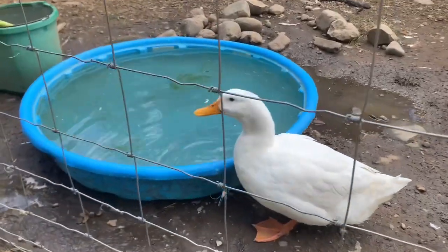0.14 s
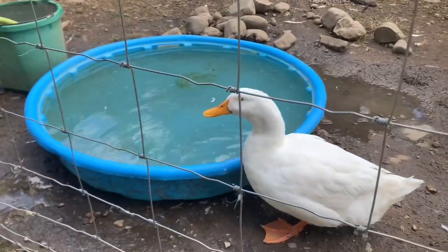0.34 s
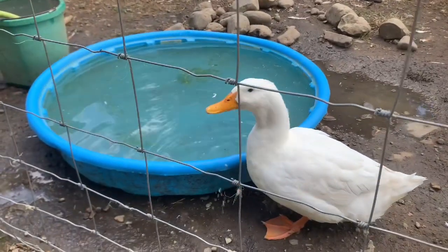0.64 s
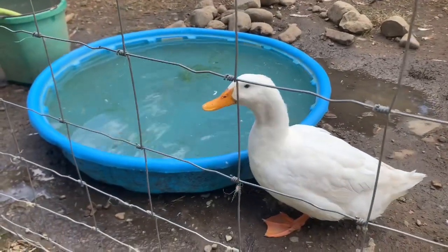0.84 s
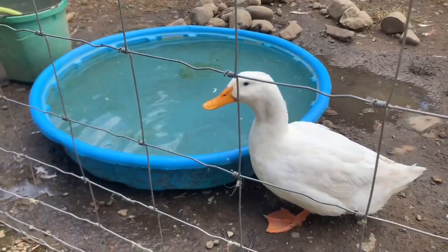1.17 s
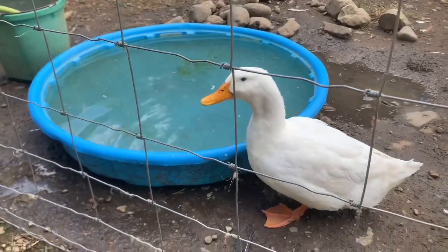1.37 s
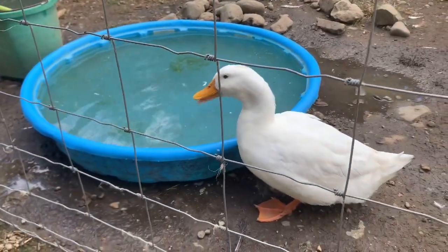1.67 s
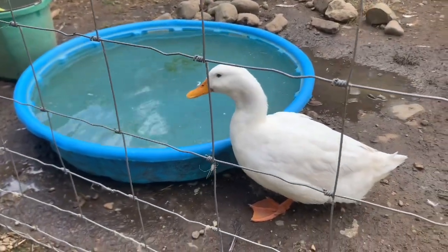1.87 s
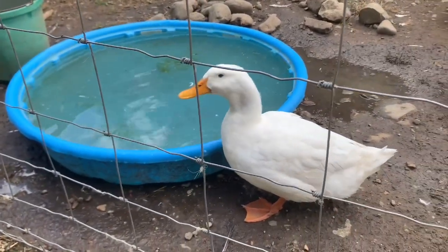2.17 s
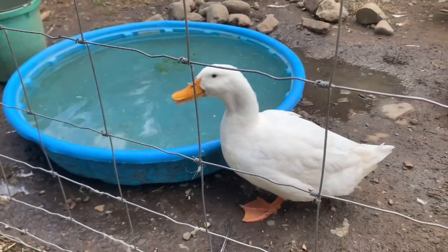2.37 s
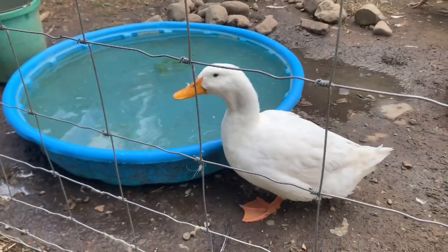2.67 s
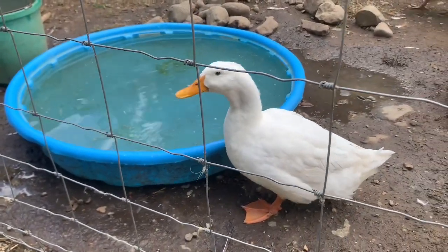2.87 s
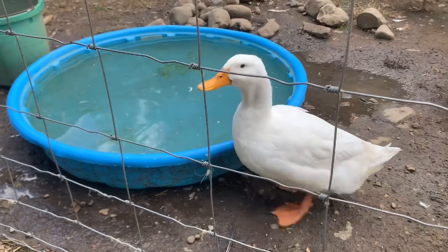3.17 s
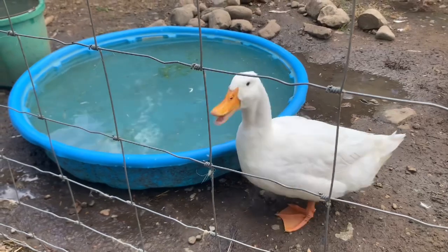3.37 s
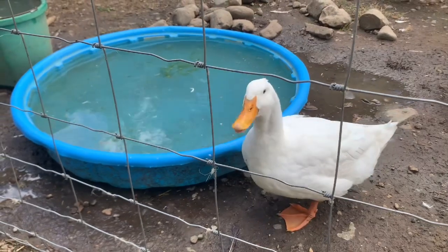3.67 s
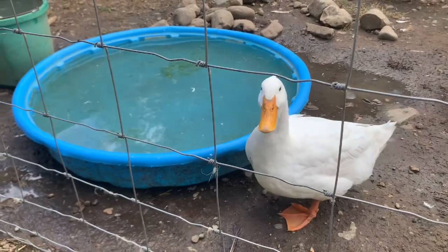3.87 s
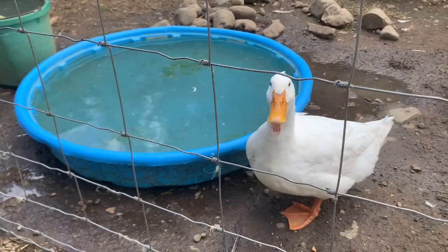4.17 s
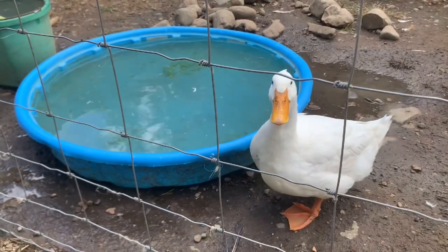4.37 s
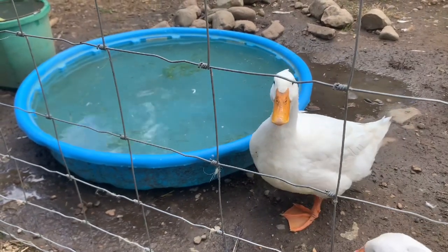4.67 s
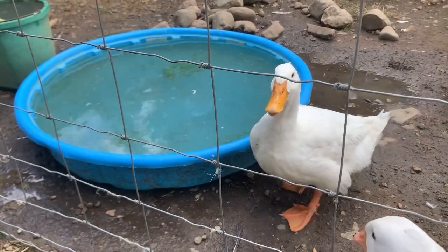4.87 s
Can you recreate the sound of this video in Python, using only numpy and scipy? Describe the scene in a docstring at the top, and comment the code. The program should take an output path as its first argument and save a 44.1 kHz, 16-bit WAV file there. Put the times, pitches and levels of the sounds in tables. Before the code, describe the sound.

Outdoors in a fenced, muddy pen, one duck near the microphone quacks steadily, short raspy bursts mostly in pairs, with small wet bill ticks between. Soft clucks from other fowl come early, then faint thin whines later. The quacks grow slightly louder and change nasal colour as the duck turns to face the microphone. Quiet air and a lumpy low rumble lie beneath.

```python
"""A duck quacks fifteen times, mostly in pairs, and turns to face the microphone, over quiet air and a low rumble.
Each quack is a rattle of five to seven beats of the syrinx: a smooth push and a ragged puff of noise,
shaped by throat and bill and echoed at once by the wet ground. Ringing resonances make small ticks of the bill.
Other fowl cluck and whine softly in the pen as gliding tones; shaped noise makes the air, rumble and a brief hiss."""
import sys
import numpy as np
from scipy import signal
from scipy.fft import rfft, irfft
from scipy.io import wavfile

SR = 44100
rng = np.random.default_rng(int(sys.argv[2]) if len(sys.argv) > 2 else 0)


def output_pcm(signal):
    """Save a mono or channel-first signal as 16-bit PCM at the path in sys.argv[1].

    Samples are clipped to [-1, 1] before scaling.
    """
    pcm = np.clip(np.atleast_2d(signal).T, -1, 1) * 32767
    wavfile.write(sys.argv[1], SR, np.round(pcm).astype(np.int16))


N = 221249
TIME = np.arange(N) / SR
TAPS, LEAD = 2048, .012  # short sounds: length in samples, and seconds they begin ahead of their moment
HZ = np.fft.rfftfreq(TAPS, 1 / SR)
AGE = np.arange(TAPS) / SR - LEAD  # seconds since the moment of a short sound


def gain_of(db):
    """Decibels to a factor."""
    return 10 ** (np.asarray(db) / 20)


def evened(x):
    """Scales to rms 1."""
    return x / np.sqrt(np.mean(x ** 2) + 1e-20)


def read(points, hz):
    """Each value column of a table, read on a log-frequency axis."""
    f, *columns = np.transpose(points)
    return np.array([np.interp(np.log(hz + 1), np.log(f + 1), c) for c in columns])


def add(mix, s, sound):
    """Lays a sound into the mix at time s."""
    part = mix[..., max(round(s * SR), 0):][..., :sound.shape[-1]]
    part += sound[..., :part.shape[-1]]


def delay(s):
    """The spectrum of a delay."""
    return np.exp(-2j * np.pi * HZ * s)


def wavering(count, size):
    """Smooth random wandering of rms 1; size is half the smoothing window in samples."""
    return evened(signal.fftconvolve(rng.standard_normal(count), signal.windows.hann(2 * size), "same"))


def noise(colour, likeness):
    """Stereo noise of rms 1 with a given spectrum and left-right likeness."""
    hz = np.fft.rfftfreq(N, 1 / SR)
    left, other = rfft(rng.standard_normal((2, N)))
    same = np.clip(read(likeness, hz)[0], -1, 1)
    right = same * left + np.sqrt(1 - same ** 2) * other
    return evened(irfft(np.array([left, right]) * gain_of(read(colour, hz)), N))


def outdoors(air_db=-58, drift_db=0.02):
    """Quiet air drifts slightly in level, with the low rumble and a brief soft hiss as shaped noise."""
    # Each row: frequency in Hz, relative level in dB per Hz.
    air_colour = [(80, -24), (160, -5.5), (270, -8), (400, -1), (520, 0), (740, -8), (1000, -1),
                  (1350, -2.5), (2000, -9.5), (3200, -23), (5000, -30.5), (8000, -37.5), (12000, -37.5),
                  (15500, -57.5)]
    hiss_colour = [(1500, -16), (2500, -6.5), (4500, 4), (7500, -4), (9000, -16.5), (12000, -27)]
    # Level of the hiss. Each row: time in seconds, level in dB.
    hiss_level = [(0, -72.5), (.09, -72.5), (.2, -87), (.35, -110)]
    # How alike the two channels are. Each row: frequency in Hz, left-right likeness from -1 to 1.
    likeness = [(60, 0.8), (120, 1), (260, 0.61), (540, 0.28), (1120, -0.54), (2320, -0.028), (4820, 0.041)]
    drift = np.interp(TIME, np.linspace(0, TIME[-1], num=40), rng.standard_normal(size=40))
    air = gain_of(air_db + drift_db * drift) * noise(air_colour, likeness)
    air = air * gain_of([[1], [-.5]])  # left, right
    hiss = gain_of(np.interp(TIME, *np.transpose(hiss_level))) * noise(hiss_colour, likeness)
    return air + rumble() + hiss


def rumble(lumpy_db=2.0):
    """Low noise with a lumpy level dies down; now and then it swells into a dull bump."""
    # Each row: frequency in Hz, relative level in dB per Hz.
    colour = [(15, -25.5), (30, -13), (48, 4), (80, 0.5), (115, -8), (170, -21.5), (400, -46), (1500, -100)]
    # Steady part, before the lumps. Each row: time in seconds, level in dB.
    steady_level = [(0, -66.5), (.3, -59.5), (.9, -55.5), (1.6, -61), (1.9, -53), (2.6, -64), (5, -69.5)]
    # Dull swells that stand out. Each row: time of the peak in seconds, length in seconds, peak level in dB.
    bumps = [(.28, 0.077, -52), (1.96, 0.044, -45), (2.675, 0.086, -46.5), (3.23, 0.3, -58),
             (3.67, 0.071, -58.5), (3.99, 0.04, -52), (4.22, 0.22, -67), (4.49, 0.13, -55.5),
             (4.81, 0.13, -57.5)]
    lumps = np.interp(TIME, np.linspace(0, TIME[-1], num=60), rng.standard_normal(size=60))
    level = gain_of(np.interp(TIME, *np.transpose(steady_level)) + lumpy_db * lumps)
    for s, length, db in bumps:
        add(level, s - length / 2, gain_of(db) * signal.windows.hann(round(length * SR)))
    return level * noise(colour, [(50, 0.77), (200, 1.0)])  # (Hz, left-right likeness)


def fowl():
    """Other birds: clucks and, from further off, whines."""
    return clucks() + whines()


def clucks(trim_db=1, hoarse=0.074, partials=3):
    """Short gliding tones with a few overtones, made hoarse by a wandering pitch and level."""
    # Each row: start in seconds, length in seconds, start pitch in Hz, end pitch in Hz,
    # level in dB before the trim and the channel balance, fall per overtone in dB.
    cluck_rows = [(.16, 0.011, 525, 366, -52.5, -28), (.9, 0.028, 522, 490, -49.5, -40),
                  (0.963, 0.023, 754, 470, -47.5, -12), (1.091, 0.025, 548, 650, -45.5, -7.5),
                  (1.173, 0.014, 666, 487, -51.5, -35), (1.331, 0.0246, 490, 586, -42, -12.5),
                  (1.398, 0.023, 670, 490, -46.5, -9), (3.432, 0.13, 513.3, 554, -57, -20),
                  (3.481, 0.028, 246, 252, -52.5, -4), (3.481, 0.037, 498, 494, -51, -19),
                  (3.62, 0.036, 241, 235, -52.5, -3), (3.866, 0.038, 235, 216, -57.5, -4.5),
                  (4.022, 0.041, 200, 181.5, -53.5, -1), (4.672, 0.039, 484, 510, -57.5, -3.5)]
    out = np.zeros((2, N))
    for s, length, start_hz, end_hz, db, fall_db in cluck_rows:
        hz = np.linspace(start_hz, end_hz, round(length * SR))
        turns = np.cumsum(hz * (1 + hoarse * wavering(len(hz), size=150))) / SR
        tone = sum(gain_of(fall_db * k) * np.sin(2 * np.pi * ((k + 1) * turns + rng.random()))
                   for k in range(partials))
        swell = np.sin(np.linspace(0, np.pi, len(hz))) * (1 + 0.3 * wavering(len(hz), size=150))
        add(out, s, gain_of(db + trim_db) * evened(tone * swell))
    return out * gain_of([[2.5], [-3]])  # left, right


def whines(waver=0.026, flutter=0.23):
    """Thin sine notes, unsteady in pitch and level, each bend through one arch."""
    # Each row: start in seconds, length in seconds, start, middle and end pitch in Hz,
    # peak level in dB before the flutter.
    notes = [(1.087, 0.092, 1256, 1300, 990, -55), (3.418, 0.35, 1030, 1141, 1083, -59.5),
             (3.704, 0.182, 970, 845, 970, -57), (3.946, 0.3, 1094, 1020, 1086, -54.5),
             (4.186, 0.15, 1222, 1235, 1194, -56), (4.305, 0.041, 933, 950, 1020, -57.5),
             (4.327, 0.068, 1204, 1220, 1330, -54), (4.856, 0.12, 980, 948, 950, -61)]
    out = np.zeros((2, N))
    for s, length, start_hz, middle_hz, end_hz, db in notes:
        u = np.linspace(0, 1, round(length * SR))
        hz = np.polyval(np.polyfit([0, .5, 1], [start_hz, middle_hz, end_hz], 2), u)
        tone = np.sin(2 * np.pi * np.cumsum(hz * (1 + waver * wavering(len(u), size=400))) / SR)
        swell = (1 + flutter * wavering(len(u), size=400)) * signal.windows.tukey(len(u), .5)
        add(out, s, gain_of(db) * tone * swell)
    return out


def ticks(scrape=0.17, scrape_s=0.0036):
    """The bill parts with a small wet tick: a click and a short scrape strike its resonances."""
    # Each row: time in seconds, peak level in dB, brightness in dB per octave.
    tick_rows = [(.349, -36, -4.5), (.879, -33, -1), (1.245, -57, 13), (1.336, -38, -0.5),
                 (2.015, -34.5, -1.5), (2.653, -32.5, 0.5), (2.899, -31.5, 1.5), (3.161, -41, 7),
                 (3.297, -30, 0), (3.878, -27.5, 2.8), (4.116, -31, 3.5), (4.49, -27.5, 6),
                 (4.665, -53, 15)]
    # What a tick rings with. Each row: frequency in Hz before a small random shift,
    # level in dB before the brightness tilt, time to fall by 60 dB in seconds.
    resonances = [(500, -4, 0.057), (862, 0, 0.036), (1220, 0, 0.05), (1945, -11.5, 0.066),
                  (2310, -9, 0.012), (3090, -5.5, 0.0043), (3930, -13.5, 0.011), (6700, -24.5, 0.018)]
    out, t = np.zeros((2, N)), AGE + LEAD
    for s, db, slope_db in tick_rows:
        ring = np.zeros(TAPS)
        for hz, level, t60 in resonances:
            decay = gain_of(level - 60 * t / t60 + slope_db * np.log2(hz / 1500))
            ring += decay * np.sin(2 * np.pi * hz * rng.uniform(0.932, 1.05) * t)
        drive = (t == 0) + scrape * rng.standard_normal(TAPS) * np.exp(-t / scrape_s)
        softening = 1 + (HZ / 8500) ** 8
        tick = at_ports(rfft(drive) * rfft(ring) * delay(LEAD) / softening, facing=0.62)
        add(out, s - LEAD, gain_of(db) * tick / abs(tick).max())
    return out


def at_ports(spectrum, facing):
    """A short sound from the duck's place, split in level and phase between the two microphone ports."""
    # Each row: frequency in Hz, left minus right in dB side-on, the same head-on, left's phase lead in radians.
    ports = [(200, 7, 1.5, 1.1), (700, -1, 1, -2), (950, 8.5, 12.5, -1.42), (1422, 0, -5, -1.7),
             (1555, -8.5, -5, -0.5), (1550, -4, -6.5, -1.1), (1926, 1, 8.5, 0.01), (2565, 15.5, 4, -2),
             (2310, 10, 7.5, -1.3), (3170, 6, 6.5, -2), (3290, 9.5, 9, -1.56), (3830, -4, 4.5, -2),
             (4330, -2.5, -5.5, -2), (5670, -3.5, 1, -2.5)]
    side_db, front_db, lead = read(ports, HZ)
    half = gain_of((side_db + facing * (front_db - side_db)) / 2) * np.exp(.5j * lead)
    return irfft(spectrum * np.array([half, 1 / half])) * signal.windows.tukey(TAPS, 1 / 3)


def duck(drag_s=0.00056, jitter_s=.0003, shimmer_db=0.29, lead_in_db=-19, limp_db=-11):
    """Each quack swells and fades while the bill opens and shuts; the beats come fastest in the middle."""
    # Each row: start in seconds, number of beats, mean beats per second, mid-quack level in dB,
    # swell from the first beat in dB, factor on the throat's resonances, bill resonance in dB, twang in Hz.
    quacks = [(0.3698, 6, 83.8, -31.5, 16, 1.05, 8, 2920), (.621, 7, 85.3, -29.5, 10, 1.012, 12, 3350),
              (0.9026, 6, 85.8, -31, 4.5, 1, 4.5, 3190), (1.354, 5, 83.8, -31.5, 2, 1.017, 11, 4350),
              (1.6163, 7, 91, -31, 10, 1.076, -1, 3490), (2.0352, 6, 84, -30, 1.5, 1.058, 0, 3930),
              (2.293, 7, 88.8, -28.5, 6, 1.027, 9, 3370), (2.66, 6, 74.2, -30.5, 14.5, 1.056, 10, 3290),
              (2.9219, 7, 96.4, -28.5, 6, 0.98, 16.5, 4540), (3.3155, 6, 86.4, -30.5, 2.5, 1.003, 4, 4320),
              (3.5595, 7, 93, -25.5, 8.5, 1.053, -3, 3700), (3.898, 6, 81.6, -27, 7.5, 1.02, 3.5, 3250),
              (4.1488, 6, 85.5, -27, 0, 1.044, 3, 4200), (4.51, 6, 86.6, -30, 5, 1, 1, 2250),
              (4.7453, 7, 89.3, -28, 4.5, .97, 2, 4600)]
    # The duck turns its head and steps closer. Each row: time in seconds, facing from 0 side-on to 1 head-on,
    # delay of the ground echo in ms.
    pose = [(.37, 0.075, 1.41), (.62, 0.071, 1.53), (1.2, 0, 1.51), (2.04, 0, 1.38), (2.85, 0.074, 1.5),
            (3.301, 0.66, 1.6), (3.6, 0.47, 1.69), (4.151, 0.92, 1.762), (4.75, 0.95, 1.91)]
    fade_db = -5  # the last beat against mid-quack
    # a harder push rattles faster and brighter, and a louder quack is brighter too
    usual_rate, bright_db_per_rate = 90.1, 0.68  # beats per s, treble dB for each beat per s more
    usual_db, bright_per_db = -29, .5  # mid-quack dB, treble dB for each dB more
    twang_db = 11  # height of the high resonance with the bill wide open
    open_late, shut_by_end = 1.27, 0.95  # widest past the middle; share of the swing done at the last beat
    rough_shut, rough_open = 0.54, 0.68  # noise share of a beat: raspier with the bill wide open
    out = np.zeros((2, N))
    pose_s, facings, echoes_ms = np.transpose(pose)
    for s, beats, rate, peak_db, swell_db, size, bill_db, twang_hz in quacks:
        facing = np.clip(np.interp(s, pose_s, facings), 0, 1)
        echo_ms = np.interp(s, pose_s, echoes_ms)
        bright_db = bright_db_per_rate * (rate - usual_rate) + bright_per_db * (peak_db - usual_db)
        colour = facing, size, bill_db, bright_db, echo_ms, twang_hz, twang_db
        first_db, last_db = peak_db - swell_db, peak_db + fade_db
        k = np.arange(round(beats))
        u = k / k[-1]  # progress through the quack, 0 to 1
        slip, shimmer = rng.standard_normal((2, len(k)))
        starts = s + k / rate + drag_s * np.sin(2 * np.pi * u) + jitter_s * slip
        arch = np.polyfit([0, .5, 1], [first_db, peak_db, last_db], 2)
        levels_db = np.polyval(arch, u) + shimmer_db * shimmer
        openings = np.sin(np.pi * shut_by_end * u ** open_late)
        for start, db, opening in zip(starts, levels_db, openings):
            rough = rough_shut + (rough_open - rough_shut) * opening
            add(out, start - LEAD, gain_of(db) * beat(opening, 1 / rate, *colour, rough=rough))
        # air rustles through the membranes before they catch
        rustle = beat(0.067, 2.3 / rate, *colour, rough=0.78, leak=4)
        add(out, s - .01 - LEAD, gain_of(peak_db + lead_in_db) * rustle)
        # and they give one last limp flap as the pressure drops
        flap = beat(0, 1 / rate, *colour, rough=0.58)
        add(out, starts[-1] + 0.0054 - LEAD, gain_of(last_db + limp_db) * flap)
    return out


def beat(opening, period, facing, size, bill_db, bright_db, echo_ms, twang_hz, twang_db, rough,
         leak=.42, leak_open=.45, peak_s=0.001594, puff_at_s=0.0023, puff_s=0.0013, scatter_s=0.00083,
         smooth_hz=2600, rasp_db=2, glide=0.024, unsteady=0.016, twang_width_hz=170):
    """One beat of the syrinx: a smooth push swells in the throat, and a ragged puff rasps through the gap."""
    # the resonances rise as the bill opens
    rise = 1 + glide * (opening - .6) + unsteady * rng.standard_normal()
    # the open bill adds a high resonance
    twang = twang_db * opening / (1 + ((HZ - twang_hz * rise) / twang_width_hz) ** 2)
    db = throat(opening, facing, size * rise, bill_db, bright_db) + twang
    push = gain_of(db) / np.sqrt(1 + (HZ / smooth_hz) ** 4) * delay(LEAD + peak_s)
    since = AGE - puff_at_s - scatter_s * rng.standard_normal()
    # blown hard, the gap never quite shuts: air leaks between beats, more with the bill open
    leaking = (leak + leak_open * opening) * np.exp(-(since / (period / 2)) ** 2)
    gap = np.exp(-(since / puff_s) ** 2) + leaking
    rasp = rasp_db * HZ ** 4 / (HZ ** 4 + smooth_hz ** 4)
    puff = rfft(gap * rng.standard_normal(TAPS)) * causal(db + rasp)
    voice = (1 - rough) * push / np.linalg.norm(push) + rough * puff / np.linalg.norm(puff)
    heard = at_ports(voice * ground(facing, echo_ms), facing)
    return evened(heard) * np.sqrt(period * SR / TAPS)  # equal energy per unit of period


def throat(opening, facing, size, bill_db, bright_db, shut_db=-10, bill_shut=0.69, bill_hz=2000,
           bill_width_hz=200):
    """Gain of throat and bill in dB; an open bill lets the treble out."""
    # Voice colour. Each row: frequency in Hz before the size factor, relative dB side-on, relative dB head-on.
    voice_colour = [(300, -40.5, -29.5), (670, -32, -36), (950, -14, -30.5), (1217, -11.5, 0),
                    (1538, 4, -4), (1850, -21, 3.5), (1993, -15.5, -18), (2518, -19.5, -10.5),
                    (2738, -26.5, -33), (2840, -17.5, -13.5), (3100, -19, -19.5), (4427, -22.5, -19.5),
                    (5300, -39, -28), (5080, -41.5, -32.5), (6290, -68, -28), (8300, -83.5, -83)]
    side_db, front_db = read(voice_colour, HZ / size)
    treble = np.clip(np.log2((HZ + 1) / 1700), 0, 1)
    bill_height = bill_db * (bill_shut + (1 - bill_shut) * opening)
    bill = bill_height / (1 + ((HZ - bill_hz) / bill_width_hz) ** 2)
    return side_db + facing * (front_db - side_db) + bill + treble * (bright_db + shut_db * (.75 - opening))


def causal(db):
    """The response of a passive resonator with this gain curve: it rings only after it is struck."""
    log_gain = np.log(gain_of(np.r_[db, db[-2:0:-1]]))
    return np.exp(np.conj(signal.hilbert(log_gain)))[:len(db)]


def ground(facing, echo_ms, echo=0.57, echo_facing=0.098, second=0.35):
    """The wet ground repeats the voice, and again more weakly when the duck faces this way: nasal bands."""
    bounce = delay(echo_ms / 10 ** 3)
    return 1 + (echo + echo_facing * facing) * bounce + second * facing * bounce ** 2


def yard(x, gap_s=0.0083):
    """A faint scatter of echoes from the pen and the trees: noise that dies at its own rate in each band."""
    # Each row: frequency in Hz, time to fall by 60 dB in seconds.
    decay_times = [(300, 0.25), (1500, 0.24), (4000, 0.29), (9000, 0.063)]
    taps = rng.standard_normal((2, SR // 2)) * (np.arange(SR // 2) > gap_s * SR)
    hz, t, z = signal.stft(taps, SR, nperseg=256)
    decay = gain_of(-60 * t / read(decay_times, hz).T)
    tail = signal.istft(z * decay, SR, nperseg=256)[1]
    return signal.fftconvolve(x, tail / np.linalg.norm(tail[0]), axes=1)[:, :N]


def scene(duck_wet_db=-30, fowl_wet_db=-12):
    """The near duck is almost dry; the other birds have more of the yard on them."""
    near, far = duck() + ticks(), fowl()
    echoes = yard(gain_of(duck_wet_db) * near + gain_of(fowl_wet_db) * far)
    return near + far + echoes + outdoors()


def record(dry, edge_hz=15700):
    """The recorder's band limit, a steep low-pass."""
    low_pass = signal.firwin(511, edge_hz, window=("kaiser", 9), fs=SR)
    return signal.oaconvolve(dry, low_pass[None], "same")


dry = scene()
out = record(dry)
output_pcm(out)
```